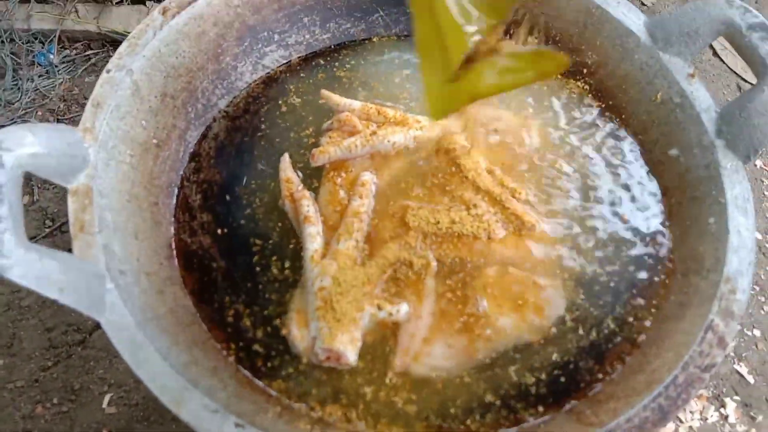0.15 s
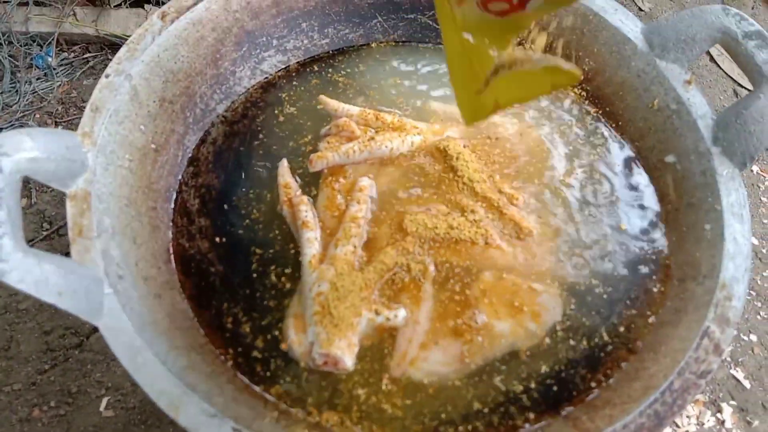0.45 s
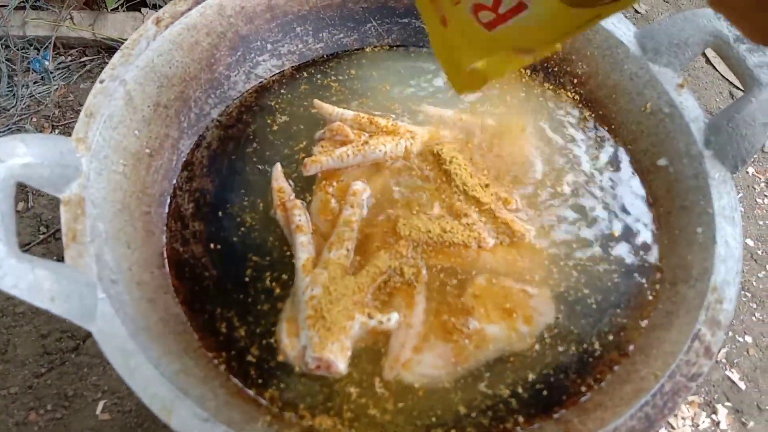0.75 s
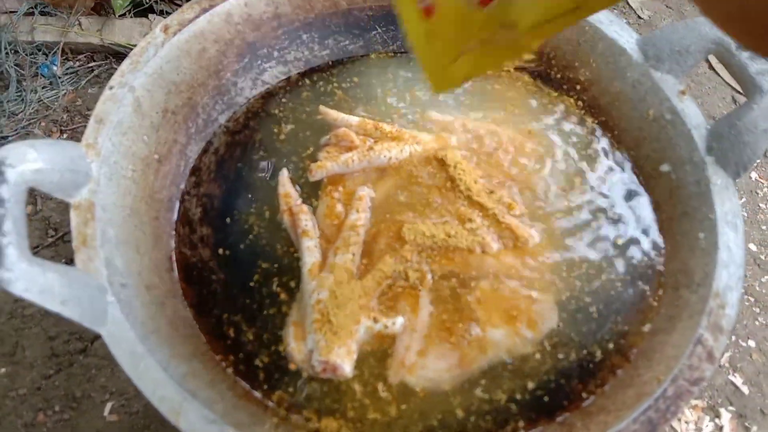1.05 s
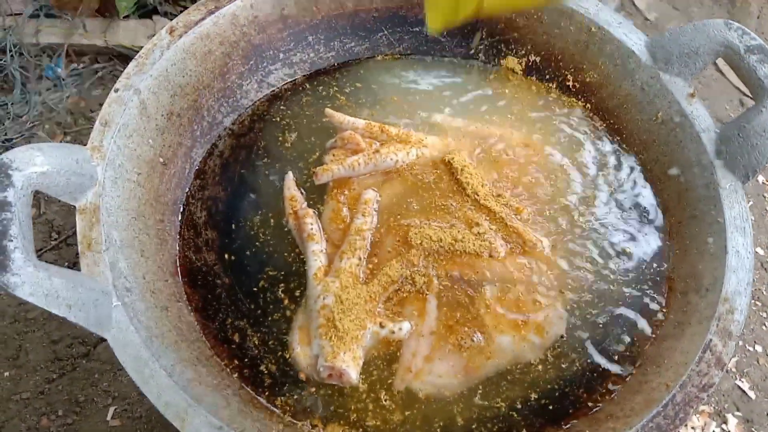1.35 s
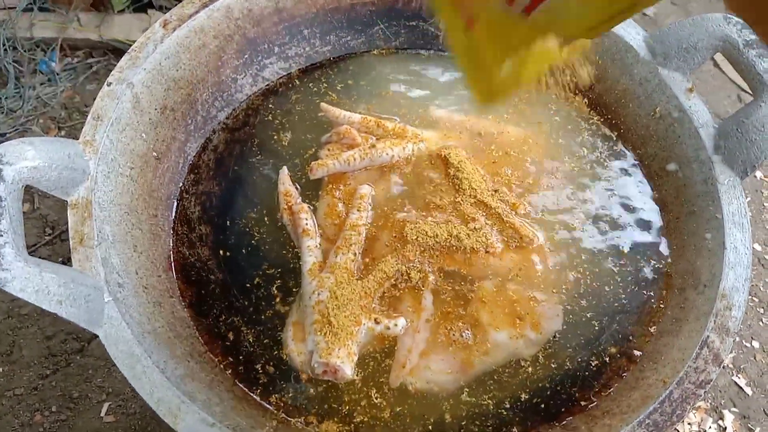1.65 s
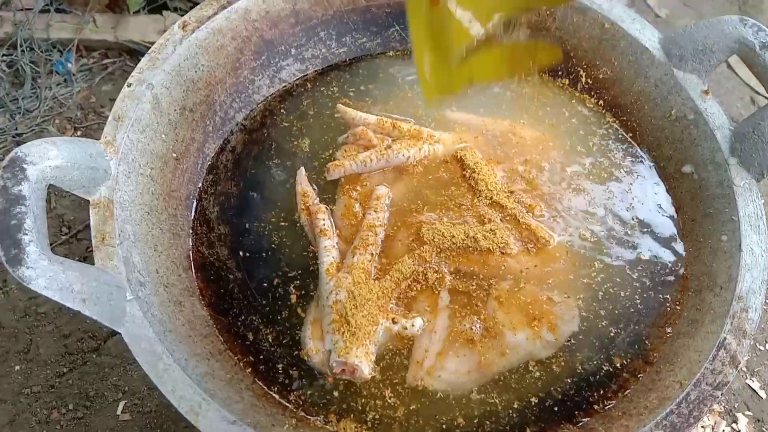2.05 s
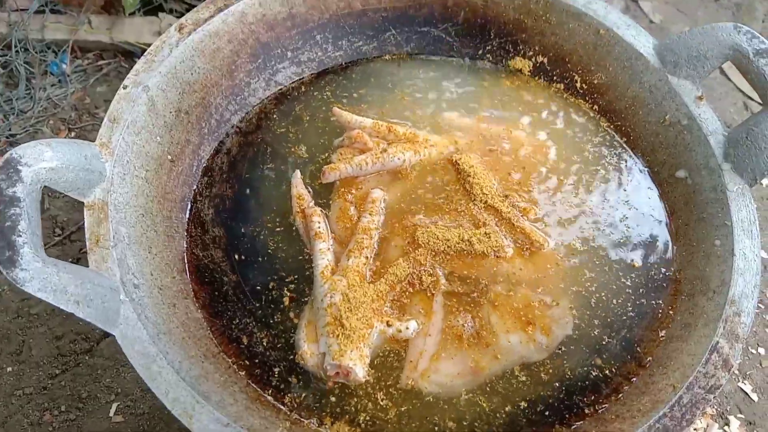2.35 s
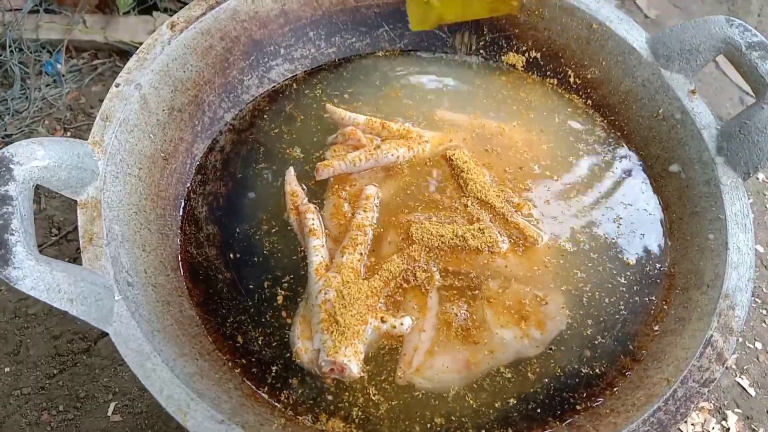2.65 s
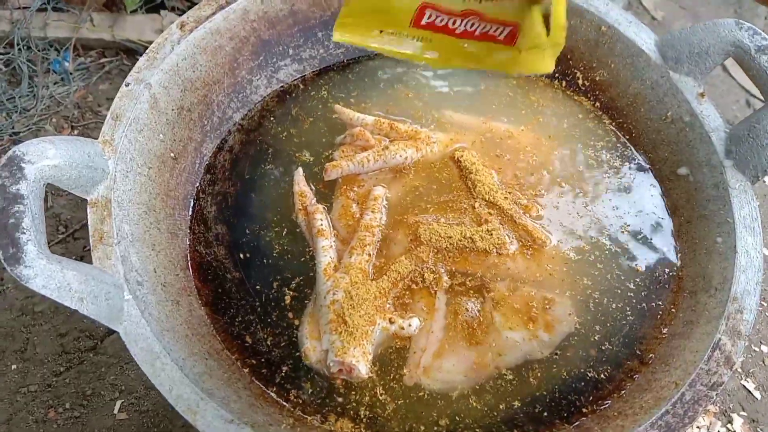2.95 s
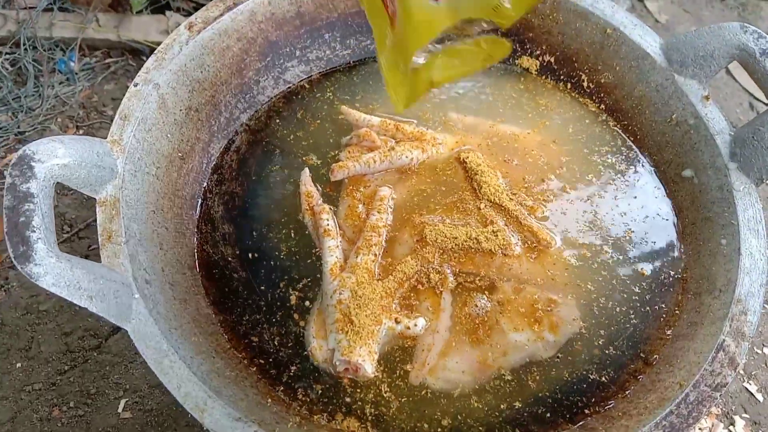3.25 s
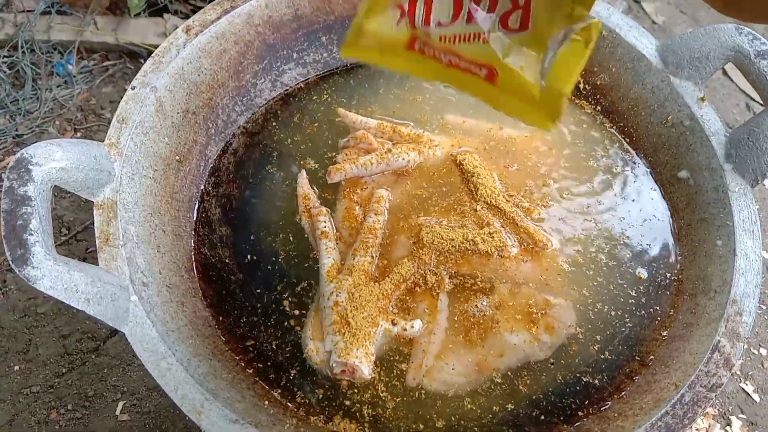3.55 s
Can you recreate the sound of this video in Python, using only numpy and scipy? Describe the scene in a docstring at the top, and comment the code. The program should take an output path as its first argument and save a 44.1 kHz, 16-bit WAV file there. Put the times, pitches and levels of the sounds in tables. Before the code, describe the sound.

A plastic sachet crinkles and snaps up close as powder is shaken out.

```python
"""Seasoning sachet over a pan

Outdoors in a yard, one microphone close to a plastic sachet shaken out over a wide metal pan of broth.
Creases in the film buckle with sharp snaps, and now and then a whole panel pops with a hollow note.
Between the snaps the film crackles finely and the powder hisses as it slides and settles.
The pan and the yard ring faintly after each snap, over quiet outdoor air."""
import sys
import numpy as np
from scipy import signal
from scipy.fft import rfft, irfft
from scipy.io import wavfile
from scipy.ndimage import uniform_filter1d, minimum_filter1d

SR = 44100
rng = np.random.default_rng(int(sys.argv[2]) if len(sys.argv) > 2 else 0)


def generate_wav(sig):
    """Save sig (samples, or channels by samples) to the path in sys.argv[1] as 16-bit PCM at SR."""
    pcm = np.round(np.clip(np.atleast_2d(sig).T, -1, 1) * 32767).astype(np.int16)
    wavfile.write(sys.argv[1], SR, pcm)


N = 163170

# spectrum of the outdoor air: frequency_hz, relative_db
AIR_SPECTRUM = [(25, -2), (70, -3.5), (160, 8), (380, -9), (800, -16), (15000, -35)]
# spectrum of the hiss of settling powder: frequency_hz, relative_db
SETTLING_SPECTRUM = [(400, -32), (800, -13), (2200, -28), (4200, -13), (6000, -2), (10300, 0), (11500, -13),
                     (15500, -17)]
# tone colour of the plastic film: frequency_hz, relative_db
FILM_SPECTRUM = [(100, -31), (260, -19.5), (420, -10), (680, 0.5), (1060, 0.5), (1220, -0.5), (1400, 4),
                 (3050, 2), (4000, -4), (4500, 2), (5750, 5), (7500, -3.5), (9300, -12.5), (13000, -12),
                 (15200, -8.5), (16000, -14.5)]
# how hard the film is flexed, as a gain on the crackle and the sliding powder: time_s, gain_db
FLEXING = [(0, -19.5), (.065, -39), (0.248, -18), (.319, -29), (0.691, -30), (.737, -35.5), (.86, -30),
           (.943, -44), (.998, -19), (1.013, -28.5), (1.237, -28.5), (1.355, -48), (1.395, -25.5),
           (1.457, -37.5), (1.472, -27.5), (1.55, -30), (1.622, -13), (1.641, -26), (1.761, -21.5),
           (1.866, -41.5), (1.901, -27), (2.13, -31), (2.172, -18), (2.196, -43.5), (2.335, -35.5),
           (2.395, -60), (2.44, -49), (2.52, -63.5), (2.653, -28), (2.714, -57), (2.72, -50), (2.829, -19),
           (2.868, -37), (2.973, -29.5), (2.994, -48), (3.077, -20.5), (3.19, -41.5), (3.219, -25.5),
           (3.342, -26), (3.62, -35.5), (3.664, -31.5), (3.697, -51)]
# creases that buckle, body (low) and fizz (high) set against the crack (middle band):
# start_s, crack_level_db, body_relative_db, fizz_relative_db
CREASE_SNAPS = [(0.0406, -25.5, -2.5, -16), (0.0533, -16.0, -12, -6), (0.1076, -22, 1, -7),
                (0.1283, -20, -7.0, -2), (0.201, -20, -3, -12), (0.2201, -19.5, 0, -7),
                (0.2456, -17, -11, -6), (0.276, -9.5, -4, -5), (0.312, -19, -1, -3),
                (0.3205, -17.5, -15, -10), (0.3858, -22.5, -2, -14), (0.4129, -22.5, -2.5, -11.5),
                (0.4211, -16, -5.5, -15), (0.445, -15, -4, -7.5), (0.4612, -17, -8.0, -21),
                (0.4909, -14.5, -10, -8), (0.512, -16, -16, -5), (0.5237, -22, 0, -18),
                (0.5975, -14, -6.0, -4.5), (0.63, -23.5, -1.5, -18), (0.6508, -23.5, 1, -9),
                (0.6715, -17.5, -8.5, -2.5), (0.7124, -20, -5, -9), (0.743, -15.5, -9, -19),
                (0.7663, -24.5, -12, -0.5), (0.7986, -19, -4, -13), (0.834, -12.5, -7, -5),
                (0.8519, -18.5, -6, -14), (0.8801, -19.5, -3.5, -13), (0.9132, -22, -5, -23),
                (0.9629, -21, -9, -7.5), (0.9798, -20, -4, -1), (0.9918, -14, -7, -12),
                (1.0007, -22, -4.5, -13.5), (1.0115, -16.5, -5, -14), (1.016, -19, -18, -5),
                (1.0465, -14.5, -1.5, -2.5), (1.0593, -19, -3, -9), (1.0696, -14.5, -12, -16),
                (1.093, -27, -7, -7), (1.11, -19, -4.5, -20), (1.1344, -24.5, -14, -18),
                (1.1819, -21, 0, -11.5), (1.1962, -20.5, -0.5, -23), (1.2183, -14, -8, -9),
                (1.245, -24.5, -0.5, -9), (1.2804, -31, -4, -13.0), (1.326, -35.5, 0, -19),
                (1.3843, -21.5, -7.0, -12), (1.3987, -27, -2, -7), (1.4053, -16.5, -8, -5),
                (1.4171, -31, 1.5, -1), (1.4614, -17, -7.5, -8), (1.4701, -21.5, -3, -9),
                (1.4973, -12.5, -0.5, -2.5), (1.5197, -20, -8, -8), (1.5812, -18.5, -0.5, -10),
                (1.6097, -13, -5.5, -18), (1.6138, -3.5, -8.5, -9), (1.7033, -12, -4.5, -1.5),
                (1.7408, -17.5, -17, -9.5), (1.7769, -16.5, -10, -9), (1.7957, -18, -14, -4),
                (1.8212, -24.5, -10.5, -8), (1.8298, -20, -2.5, -4.5), (1.8757, -19, -3.5, -21),
                (1.8855, -20, -8, -8), (1.96, -22, -15, -14.0), (1.9852, -13.0, -8, -10.5),
                (2.0249, -18.5, -6.5, -4), (2.055, -19, -8.5, -7), (2.0667, -18, -8.5, -10),
                (2.0969, -16.5, -18, -27), (2.1041, -21, -13, -6), (2.11, -18.0, -7, -8.0),
                (2.1194, -19.5, -16, -2.5), (2.1443, -17, -8.5, -9), (2.1611, -20, -8.5, -14),
                (2.176, -15.5, -11, -6.5), (2.2139, -20.5, -3.5, -2.5), (2.2299, -19, -9.5, -14),
                (2.283, -14, -6.5, -5.5), (2.305, -24, -8.5, -20), (2.3109, -23, -9, -4.5),
                (2.4176, -40.0, -18, -11.5), (2.425, -37.5, -9, -10), (2.6263, -14.5, -11, -15),
                (2.6778, -24.5, -20, -22), (2.732, -27, -3, -16), (2.739, -23.5, -3, 0.5),
                (2.7706, -14.5, -10.0, -13), (2.8004, -20, -8, -2), (2.8185, -20, -7, -10.0),
                (2.8251, -26.5, 3.5, -25), (2.8462, -16, -8, -6), (2.8892, -16.5, -10.5, -9.5),
                (2.8963, -21, -9, -5), (2.9155, -12, -14, -15), (2.9503, -29.5, -4, 3),
                (2.9696, -19, 0, -6), (3.0547, -18, -6, -8), (3.074, -9, -9, -5), (3.0847, -9, -16, -13),
                (3.1056, -12, -5, 2), (3.1336, -16.5, -6.5, -5), (3.2492, -22.5, -1, -9),
                (3.2811, -21, 5.5, -11), (3.292, -4, -10, -9), (3.3025, -19.5, -2, -12),
                (3.3077, -17, -1.5, -12), (3.3193, -27, 3, -2), (3.325, -14.0, -7.5, -10.5),
                (3.3627, -19, -22, -11), (3.3722, -25.5, -7, -8.5), (3.3806, -27, -15, -15.5),
                (3.402, -10, -6, 1.5), (3.4109, -12.5, -13, -16), (3.4398, -21.5, -12, -10.5),
                (3.4906, -20.5, -31, -13), (3.5816, -18, -6, -12.5), (3.629, -19.5, -8.5, -8.5)]
# resonances of the pan and the air in it: pitch_hz, relative_db, t60_s
PAN_MODES = [(720, -4, .07), (1068, -1, .14), (1839, -1, .11), (2292, -1, .09), (2980, -3, .08),
             (5547, 0, .05)]
# wide panels of the sachet that pop, plus a few low hollow knocks as the sachet is handled (the rows below 500
# Hz): start_s, pitch_hz, level_db
PANEL_POPS = [(.223, 720, -12), (.971, 706, -23), (1.403, 1760, -13.5), (1.406, 390, -27),
              (1.4985, 1440, -11), (2.022, 404, -30.5), (2.282, 1550, -7.5), (2.3995, 1900, -26),
              (2.9338, 1310, -17), (2.9405, 1120, -12.5), (3.087, 266, -29.5), (3.1798, 1900, -23),
              (3.578, 830, -16)]

BODY_EDGE_HZ, FIZZ_EDGE_HZ = 2850, 9370  # the crack band lies between these


def from_db(db):
    """Decibels to gain."""
    return 10 ** (np.asarray(db) / 20)


def unit_rms(x):
    """Scale to rms 1."""
    return x / np.sqrt(np.mean(x ** 2) + 1e-20)


def unit_energy(x):
    """Scale to energy 1."""
    return x / np.sqrt(np.sum(x ** 2) + 1e-20)


def decay(t60_s, size):
    """Exponential decay, 60 dB down after t60_s."""
    return from_db(-60 * np.arange(size) / SR / t60_s)


def response(spectrum, size=1024):
    """Minimum-phase impulse response with the given spectral shape and energy 1."""
    hz, db = np.transpose(spectrum)
    bins_hz = np.maximum(np.fft.rfftfreq(size, 1 / SR), 1)
    magnitude = from_db(np.interp(np.log(bins_hz), np.log(hz), db))
    cepstrum = irfft(np.log(magnitude))
    cepstrum[1:size // 2] *= 2
    cepstrum[size // 2 + 1:] = 0
    return unit_energy(irfft(np.exp(rfft(cepstrum))))


def through(x, impulse):
    """Filter by an impulse response."""
    return signal.fftconvolve(x, impulse)[:len(x)]


def butterworth(x, hz, kind, order=2):
    """Low-, high- or band-pass filter."""
    return signal.sosfilt(signal.butter(order, hz, kind, fs=SR, output="sos"), x)


def steady_noise(impulse, level_db):
    """Even noise, coloured by an impulse response."""
    return from_db(level_db) * unit_rms(through(rng.standard_normal(N), impulse))


def outdoor_air():
    """Quiet open air all round the microphone, mostly a low rumble."""
    return steady_noise(response(AIR_SPECTRUM, size=4096), level_db=-67.5)


def settling_powder():
    """Powder settles with a faint, steady, high hiss."""
    return steady_noise(response(SETTLING_SPECTRUM, size=4096), level_db=-59.5)


def sliding_powder(film):
    """Grains slide along the film with a hiss in its colour."""
    return steady_noise(film, level_db=-17)


def facet_flip(t60s_s, pitch_hz, ring_gain, tick_gain, width_hz=430, size=1024):
    """A facet of film slips, creaks, ticks a quarter of the way in, then flutters; one signal per t60."""
    tick_s, creak_t60_s, mean_hold_s = .0005, .0045, .0009
    slip_db, slip_ahead_s, slip_t60_s = -8, .004, .005
    t = (np.arange(size) - size // 4) / SR
    noise = rng.standard_normal(size) * (1 + tick_gain * ((t >= 0) & (t < tick_s)))
    # the facet's own resonance
    radius, angle = np.exp(-np.pi * width_hz / SR), 2 * np.pi * min(pitch_hz, SR / 2) / SR
    feedforward = np.array([1, 0, -1]) * (1 - radius ** 2) / 2
    ring = signal.lfilter(feedforward, [1, -2 * radius * np.cos(angle), radius ** 2], noise)
    flutter = noise + ring_gain * ring
    # the creak swells as the crease gives; full strength holds briefly before the decay
    creak_db = 60 * np.minimum(t, 0) / creak_t60_s * 2 ** rng.uniform(-1, 1)
    since_hold = np.maximum(t - mean_hold_s * 2 * rng.random(), 0)
    since_slip = t + slip_ahead_s * rng.random()
    slip = from_db(slip_db - 60 * np.abs(since_slip) / slip_t60_s) * rng.random()
    return [flutter * (slip + from_db(creak_db - 60 * since_hold / t60_s)) for t60_s in t60s_s]


def film_crackle(film, rate_per_s=420, jitter_gaps=5, spread_db=7.5, pitches=40):
    """Small facets flip in uneven clumps: the wider ones pop, the narrow ones tick."""
    count = N // 20
    lateness, pitch_draw = rng.random((count, 2)).T
    starts = ((np.arange(count) + jitter_gaps * lateness) * SR / rate_per_s).astype(int)
    strengths = from_db(spread_db * np.minimum(rng.exponential(1, count), 2))
    out = np.zeros(N)
    for k, pitch_hz in enumerate(np.geomspace(560, 6760, pitches)):
        chosen = (starts < N) & ((pitch_draw * pitches).astype(int) == k)
        clicks = np.zeros(N)
        clicks[starts[chosen]] = strengths[chosen]
        flip, = facet_flip(t60s_s=[.0084], pitch_hz=pitch_hz, ring_gain=4.33, tick_gain=.5)
        out += through(clicks, unit_energy(through(flip, film)))
    treble_tilt = response([(BODY_EDGE_HZ / 2, -3.5), (BODY_EDGE_HZ * 2, 0), (FIZZ_EDGE_HZ, 1.5)])
    return from_db(-.5) * unit_rms(through(out, treble_tilt))


def crease_snaps(film, centre_hz=3854, spread_octaves=.754, attack_s=.0046):
    """Creases buckle and die away fast, treble first; the brighter a crease, the harder its first tick."""
    bands = [(BODY_EDGE_HZ, "low"), ([BODY_EDGE_HZ, FIZZ_EDGE_HZ], "band"), (FIZZ_EDGE_HZ, "high")]
    t60s_s = (.033, .017, .01)  # body, crack, fizz
    out = np.zeros(N + SR)
    for start_s, crack_db, body_db, fizz_db in CREASE_SNAPS:
        pitch_hz = centre_hz * 2 ** (spread_octaves * rng.standard_normal())
        flips = facet_flip(t60s_s, pitch_hz, ring_gain=1.11, tick_gain=2.4 * from_db(fizz_db / 2))
        start, lead = int(start_s * SR), len(flips[0]) // 4
        for (edge_hz, kind), relative_db, flip in zip(bands, (body_db, 0, fizz_db), flips):
            part = butterworth(through(flip, film), edge_hz, kind, order=4)
            attack_rms = np.std(part[lead:lead + int(attack_s * SR)])
            out[start:start + len(part)] += from_db(crack_db + relative_db) * part / attack_rms
    return out[lead:lead + N]  # each tick lands on its start_s


def air_thud(sachet, centre_hz=130, gain_db=-25.5):
    """Each sharp movement of the film also pushes a little air at the microphone."""
    envelope = np.sqrt(np.maximum(uniform_filter1d(sachet ** 2, size=256), 0))
    push = envelope * rng.standard_normal(N)
    return from_db(gain_db) * butterworth(push, [centre_hz / 2, centre_hz * 2], "band")


def pan_ring(sachet, gain_db=-24):
    """The metal pan under the sachet, and the air in it, ring briefly in sympathy."""
    t = np.arange(SR // 2) / SR
    modes = sum(from_db(db) * np.sin(2 * np.pi * hz * t) * decay(t60_s, len(t))
                for hz, db, t60_s in PAN_MODES)
    return through(sachet, from_db(gain_db) * unit_energy(modes))


def yard_echo(sachet, gain_db=-20.5, t60_s=.079, delay_s=.0036):
    """The yard returns a short, diffuse echo just behind the direct sound."""
    t = np.arange(SR // 2) / SR
    reflections = rng.standard_normal(len(t)) * decay(t60_s, len(t)) * (t > delay_s)
    return through(sachet, from_db(gain_db) * unit_energy(reflections))


def panel_pops(rise_s=.00079, t60_s=.019, sag=.057, overtone_ratio=1.9, overtone_db=-13):
    """A whole panel flips, or the handled sachet knocks hollowly, and rings with a note and one overtone; the
    note sags as it relaxes."""
    out, t = np.zeros(N + SR), np.arange(SR // 10) / SR
    relaxing = decay(t60_s, len(t))
    envelope = (1 - np.exp(-t / rise_s)) * relaxing
    for start_s, pitch_hz, level_db in PANEL_POPS:
        phase = 2 * np.pi * pitch_hz * np.cumsum(1 + sag * (relaxing - .5)) / SR
        note = np.sin(phase) + from_db(overtone_db) * np.sin(overtone_ratio * phase)
        start = int(start_s * SR)
        out[start:start + len(t)] += from_db(level_db) * envelope * note
    return out[:N]


def scene():
    """The sachet close up, with pan, yard and open air behind it, in mono."""
    film = butterworth(response(FILM_SPECTRUM), hz=120, kind="high")
    flex = from_db(np.interp(np.arange(N) / SR, *np.transpose(FLEXING)))
    sachet = crease_snaps(film) + panel_pops() + flex * (film_crackle(film) + sliding_powder(film))
    mix = sachet + air_thud(sachet) + pan_ring(sachet) + yard_echo(sachet)
    return (mix + settling_powder() + outdoor_air())[None]


def record(dry):
    """After the microphone, a fast limiter holds down the highest peaks and the top treble is cut."""
    ceiling, limiter_s, cutoff_hz = .93, .002, 15700
    span = int(limiter_s * SR)
    needed_gain = ceiling / np.maximum(np.abs(dry), ceiling)
    gain = uniform_filter1d(minimum_filter1d(needed_gain, size=span), size=span)
    top_cut = signal.ellip(10, .1, 80, cutoff_hz, fs=SR, output="sos")
    return signal.sosfilt(top_cut, dry * gain)


dry = scene()
out = record(dry)
generate_wav(out)
```